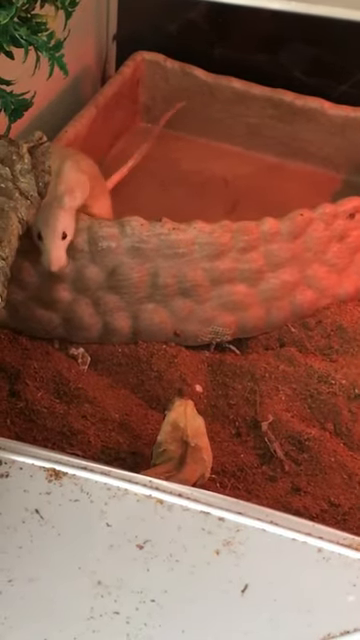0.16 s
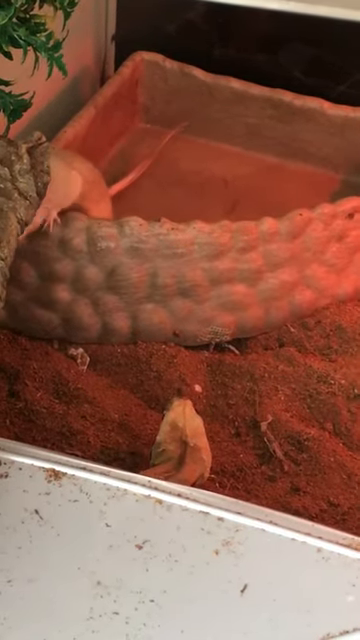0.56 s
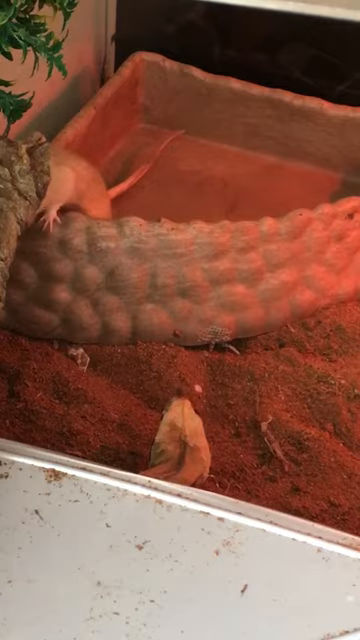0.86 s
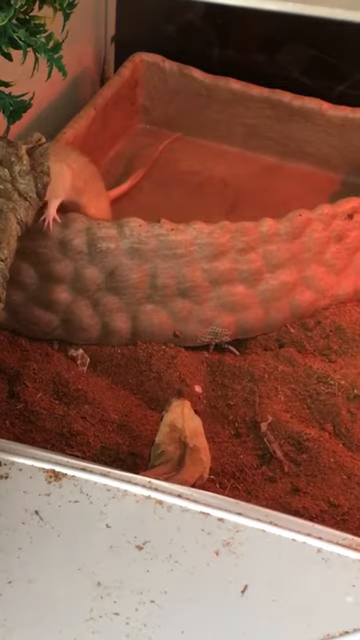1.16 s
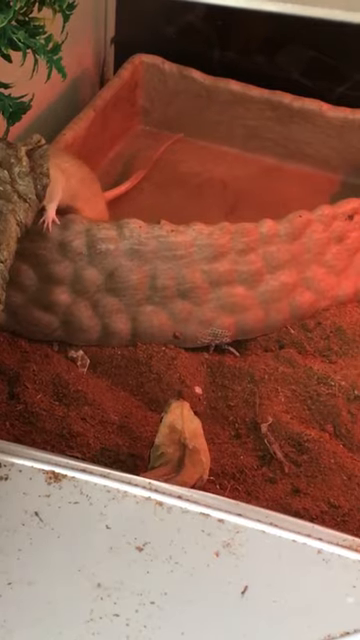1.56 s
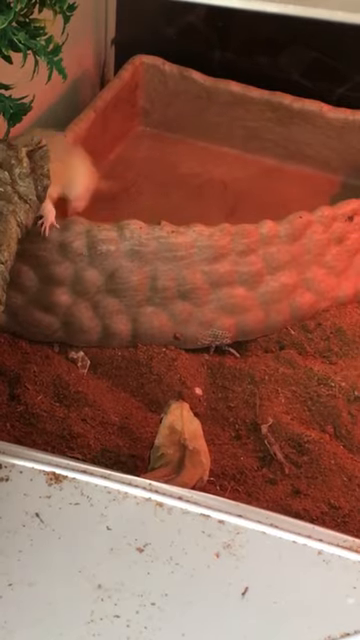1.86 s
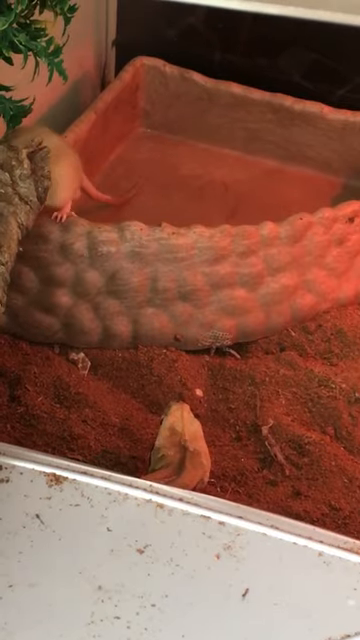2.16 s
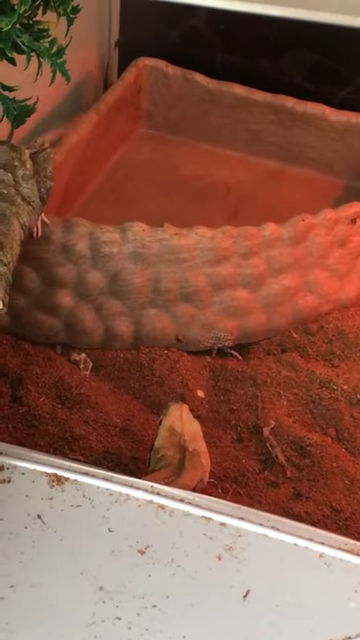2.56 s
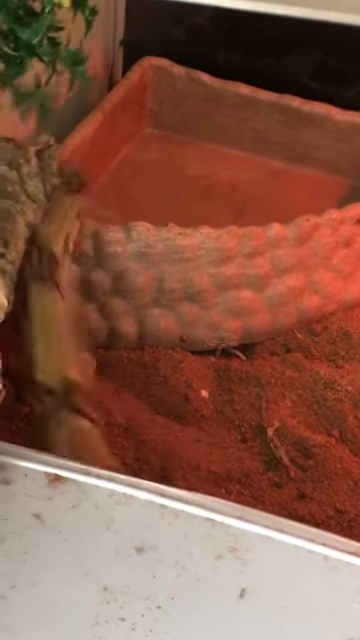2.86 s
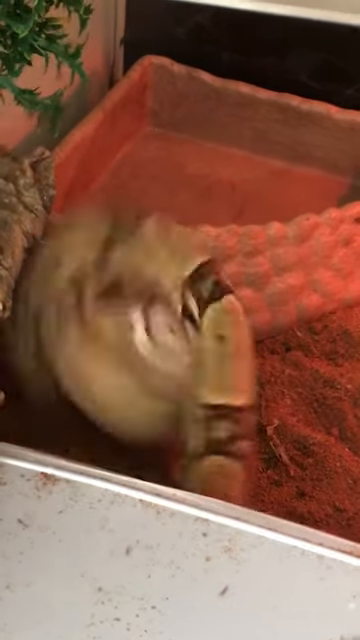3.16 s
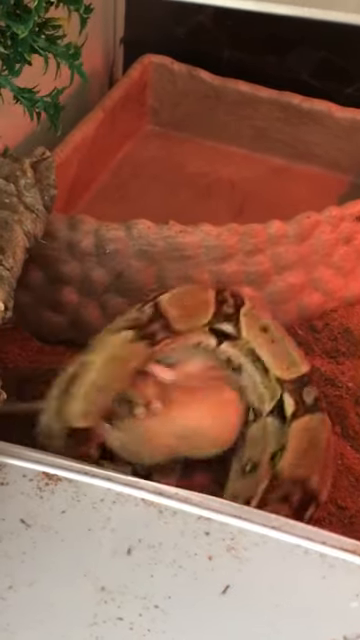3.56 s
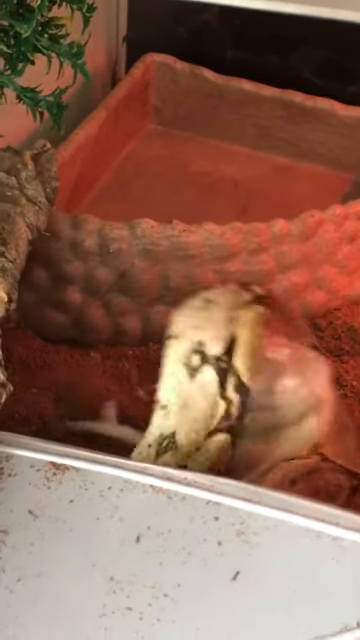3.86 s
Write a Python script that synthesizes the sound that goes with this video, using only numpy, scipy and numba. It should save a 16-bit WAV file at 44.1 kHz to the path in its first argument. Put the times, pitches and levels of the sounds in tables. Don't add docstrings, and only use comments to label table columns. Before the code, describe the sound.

A rat's two hoarse squeals dominate. Quiet low room hum comes first, with faint dry ticks around 1.4 to 2.2 seconds. At 2.7 a snake lunges: sharp scuffs and heavy hollow thuds, strongest near 2.75 and 3.1, rattle loose bedding. A breathy, rasping squeal runs 2.8 to 3.27; a second starts abruptly at 3.45, dulling and fading by 3.9. Close phone pickup, short boxy echoes.

```python
import sys
import numpy as np
from scipy import signal
from scipy.fft import rfft, irfft
from scipy.io import wavfile
from scipy.ndimage import uniform_filter1d
from numba import njit

SR = 44100
rng = np.random.default_rng(int(sys.argv[2]) if len(sys.argv) > 2 else 0)


def natural_amplitude(level_db):
    exponent = np.asarray(level_db, float) / 20
    return 10 ** exponent


def put_to_file(sound):
    columns = np.atleast_2d(sound).T
    safe = np.clip(columns, -1, 1)
    whole_steps = np.round(safe * 32767)
    wavfile.write(sys.argv[1], SR, whole_steps.astype(np.int16))


N = 176400


def rms_one(x):
    return x / np.sqrt(np.mean(x ** 2) + 1e-20)


def drift(rate_hz):
    r = np.exp(-2 * np.pi * rate_hz / SR)
    noise = rng.standard_normal(N + SR)
    return rms_one(signal.lfilter([1], [1, -2 * r, r * r], noise)[SR:])


def filtered(x, order, hz, kind):
    return signal.sosfilt(signal.butter(order, hz, kind, fs=SR, output="sos"), x)


def coloured(points, humps=()):
    hz = np.fft.rfftfreq(N, 1 / SR) + 1
    table = np.array(points)
    level_db = np.interp(np.log(hz), np.log(table[:, 0]), table[:, 1])
    level_db = level_db - 50 * np.maximum(np.log2(table[0, 0] / hz), 0)
    for centre_hz, width_hz, db in humps:
        level_db = level_db + db * np.exp(-((hz - centre_hz) / width_hz) ** 2 * 2)
    return rms_one(irfft(rfft(rng.standard_normal(N)) * natural_amplitude(level_db), N))


def swell(t, rise_s, t60):
    t = np.maximum(t, 0)
    return (1 - np.exp(-t / rise_s)) ** 2 * natural_amplitude(-60 * t / t60)


@njit
def resonate(x, cos_w, r):
    y = np.zeros(len(x))
    for i in range(2, len(x)):
        y[i] = x[i] - x[i - 2] + 2 * r * cos_w[i] * y[i - 1] - r * r * y[i - 2]
    return y


def cavity(air, hz, width_hz):
    cos_w = np.cos(2 * np.pi * np.clip(hz + np.zeros(N), 10, .45 * SR) / SR)
    r = np.exp(-np.pi * width_hz * 1.5 / SR)
    return rms_one(resonate(resonate(air, cos_w, r), cos_w, r))


# f/Hz, level/dB per Hz
ROOM_TONE = [(42, -5.5), (88, -1), (131, -9), (355, -18), (1280, -20.5), (2300, -25), (3000, -29.5),
             (9500, -39.5), (15800, -50.5)]
# f/Hz, width/Hz, level/dB
ROOM_HUMPS = [(54.4, 20.4, 6), (80.4, 10, -2), (131.6, 17, -10.5), (168.2, 11.7, 8.5), (220, 14, 9),
              (267.6, 18, -9), (375, 36, 7.5), (526, 49, -4.5), (626, 19, 6.5), (836, 27, -8.5),
              (990, 78, 2), (1267, 22, 4), (4880, 410, -3), (7700, 710, -3), (10400, 550, -5.5)]


def room_tone(cry):
    duck_db, recovery_hz = -1.5, 0.83
    r = np.exp(-2 * np.pi * recovery_hz / SR)
    loud = np.tanh(60 * signal.lfilter([1 - r], [1, -r], np.abs(cry)))
    return natural_amplitude(-38 + 0.5 * drift(1.54) + duck_db * loud) * coloured(ROOM_TONE, ROOM_HUMPS)


def enclosure_tail(x):
    t = np.arange(SR // 2) / SR
    tail = signal.lfilter([1], [1, -.55], rng.standard_normal(len(t)))
    tail = filtered(tail * swell(t, 0.0011, 0.11), 2, 900, "high")
    return natural_amplitude(-10.5) * signal.fftconvolve(x, tail / np.sqrt(np.sum(tail ** 2)))[:N]


def debris():
    level_db, hardness_share, rise_s, t60_s = -22, 1.45, 0.023, 0.13
    t = np.arange(N) / SR
    shake = np.zeros(N)
    for s, db, hard_db, _ in THUDS:
        shake += natural_amplitude(db + level_db + hardness_share * hard_db) * swell(t - s, rise_s, t60_s)
    grains = rng.standard_normal(N) * natural_amplitude(2.0 * drift(60))
    return shake * rms_one(filtered(grains, 2, [244, 700], "band"))


# t/s, level/dB, hardness/dB, ring length/multiple of t60
THUDS = [(2.673, -32, 11, 1.01), (2.728, -12, 6, .7), (2.738, 5, 3.5, .92), (2.794, -21.5, 11.5, 1.01),
         (2.826, -23, 11.5, 1.01), (2.866, -3.5, 1, .6), (2.902, -18.5, 7, 1.01), (2.948, -18, -12, 1.01),
         (3.001, -24, -19, .8), (3.039, -24.5, 14, 1.01), (3.1, 4, -9, .55), (3.141, -30, 2, 1.01),
         (3.151, -16.5, -17, .8), (3.21, -33, -11, 1.01), (2.885, -27, -24, .9), (2.762, -19, 9.5, 1.01),
         (3.01, -37, 13, 1.01), (3.061, -27, 11.5, 1.01), (3.121, -27.5, 13.5, 1.01),
         (2.809, -23.5, 10, 1.01)]
# f/Hz, level/dB, t60/s, swell/s, share of hardness/1
FLOOR_MODES = [(76, -3, 0.12, 0.067, -1.69), (127.6, 16, 0.097, 0.023, 0.041),
               (186.6, 10, 0.034, 0.0056, 0.47), (249.7, -10, 0.096, 0.01, 1.5),
               (338, -13, 0.046, 0.0063, 1.83), (469, -29, 0.1, 0.0092, 1.75),
               (600, -37, 0.053, 0.009, 0.98), (740, -45, 0.13, .004, 1.9),
               (1166, -22.5, 0.052, 0.0029, 0.88)]


def thuds():
    out, t = np.zeros(N + SR), np.arange(SR // 2) / SR
    for s, db, hard_db, ring in THUDS:
        i = int(s * SR)
        for hz, mode_db, t60, rise_s, share in FLOOR_MODES:
            detune, phase = rng.standard_normal(2)
            wave = np.sin(2 * np.pi * hz * (1 + 0.051 * detune) * t + 2 * phase)
            level = natural_amplitude(db + mode_db + share * hard_db)
            out[i:i + len(t)] += level * swell(t, rise_s, t60 * ring) * wave
    return out[:N]


# t/s, level/dB, rise/s, t60/s, tilt/dB per octave
SCUFFS = [(1.395, -62, .003, .05, 3), (1.76, -40, 0.011, 0.11, 1), (1.853, -41, 0.0015, 0.035, -1),
          (2.15, -57, 0.025, 0.35, 14), (2.675, -39.5, 0.0036, 0.19, 5), (2.684, -39, 0.00034, 0.023, -7),
          (2.728, -17.5, 0.0044, 0.046, 0), (2.7354, -14, 0.00096, 0.047, 3.5),
          (2.775, -30.5, 0.0014, 0.16, -4), (3.310, -52, 0.00067, 0.021, 12),
          (3.413, -45, 0.0015, 0.03, 12.5)]
# f/Hz, level/dB per Hz
GRIT = [(530, -47), (900, -2), (1160, -10), (1420, -6), (4920, -4.5), (5610, -3), (16000, -23)]


def scuffs():
    grit = coloured(GRIT) * natural_amplitude(1.0 * drift(270))
    out, t = np.zeros(N + SR), np.arange(SR // 4) / SR
    octaves = np.log2(np.fft.rfftfreq(len(t), 1 / SR) / 5000 + 0.046)
    for s, db, rise_s, t60, tilt_db in SCUFFS:
        i = int(s * SR)
        burst = irfft(rfft(grit[i:i + len(t)]) * natural_amplitude(tilt_db * octaves), len(t))
        out[i:i + len(t)] += natural_amplitude(db) * swell(t, rise_s, t60) * burst
    return out[:N]


def slapped(air):
    slaps_per_s, jitter_db, slap_db, spread_db = 390, 2.5, 8.5, 2.5
    beats = np.floor(np.cumsum(slaps_per_s * natural_amplitude(jitter_db * drift(90))) / SR)
    onsets = 1.0 * (np.diff(beats, prepend=0) > 0)
    strength = natural_amplitude(slap_db + spread_db * np.minimum(rng.exponential(1, N), 1.9))
    return air * (1 + uniform_filter1d(onsets, size=5) * 5 * strength)


def throat(rasp, hz):
    return cavity(rasp, hz, 644) - natural_amplitude(-10) * cavity(rasp, hz * 1.1, 870)


def airway(air, table, scale_hz, control_db, patch, moved):
    out = np.zeros(N)
    for k, (place, width_hz, db) in enumerate(table):
        level = (-1) ** k * natural_amplitude(db + control_db) * patch()
        out += level * cavity(air, scale_hz * place * moved(), width_hz)
    return out


def fixed_cavities(air, table):
    return sum(natural_amplitude(db) * cavity(air, hz, width_hz) for hz, width_hz, db in table)


# t/s, level over effort/dB
LIP_HISS = [(2.8, 0), (2.85, -4), (2.9, -6), (2.94, 3), (3.0, -7), (3.04, -8), (3.075, 8), (3.11, -4),
            (3.16, 1), (3.26, -5), (3.46, 3), (3.52, 0), (3.58, 1), (3.68, 4), (3.76, 6), (3.83, 6),
            (3.92, -4)]


def lip_hiss(t):
    hiss = filtered(rng.standard_normal(N), 2, 5700, "high")
    return natural_amplitude(-13 + np.interp(t, *np.transpose(LIP_HISS))) * hiss


# f/multiple of throat, width/Hz, level/dB
TONGUE = [(1.3, 700, -1), (1.65, 960, -7.5)]
# f/multiple of throat, width/Hz, level/dB
MOUTH = [(2.12, 1300, -5.5), (2.62, 600, -16.5), (2.97, 930, -9.5), (3.4, 1390, -26), (3.75, 1510, -19)]
# f/Hz, width/Hz, level/dB
CHEST = [(1845, 370, -25), (2400, 1300, -23.5)]
# f/Hz, width/Hz, level/dB
SQUEEZED_FIRST = [(2090, 660, -15.5), (3280, 310, -3), (5300, 2040, 2.5), (5980, 1640, 8.5),
                  (7900, 970, -7), (8980, 1400, 0)]
SQUEEZED_SECOND = [(2180, 470, -6.5), (3350, 280, -0.5), (5570, 180, -7), (6440, 420, -11),
                   (12360, 1100, -9.5), (14600, 1600, -17)]
# f/Hz, width/Hz, level/dB
WHEEZE = [(976, 200, -23.5), (1250, 230, -19)]
# t/s, effort/dB, throat f/Hz, tongue gap/dB, mouth
# opening/dB, squeeze/dB
FIRST_SQUEAL = [(2.79, -51, 4100, -10, 16.5, -14), (2.808, -32, 3800, -21, 5, -28),
                (2.825, -33.5, 3830, -8, 0, -6), (2.835, -26, 4210, -7, 2, -7.5),
                (2.852, -31.5, 4100, -8, 5, -13), (2.862, -22, 3760, -12, 2.5, -13.5),
                (2.885, -27.5, 3770, -16, 4.5, -16), (2.897, -24, 3700, -14, -4, -18.5),
                (2.91, -26, 3700, -14, 0, -25),
                (2.92, -27.5, 3800, -12, 0, -29), (2.932, -19, 3870, -8, -3, -11),
               (2.955, -19, 3940, -12, -3, -14), (2.985, -17, 3950, -5, -4.5, -15),
               (3.002, -18, 3820, 0, -3, -18), (3.017, -23, 3900, -12, 1, -3),
                (3.017, -22.5, 4100, -4, -9, -22), (3.028, -12, 4120, -3.5, -2.5, -42),
                (3.06, -18.5, 4100, -7.5, 2, -26), (3.082, -15, 3820, -4.5, -2, -20),
                (3.125, -18, 3630, -4, -1.5, -8), (3.165, -23.5, 3880, 3, -43, 1.5),
                (3.21, -23.5, 4270, -11, -22, -6), (3.254, -23, 4270, -19, -21, -4.5),
                (3.272, -61, 4260, -12, -16, -18)]
SECOND_SQUEAL = [(3.45, -51, 4100, -9, 2, -27), (3.456, -21, 4130, -9, -11, -27),
                 (3.465, -15, 4100, -13, -8, -18), (3.471, -22, 4100, -1, -0.5, -18),
                 (3.48, -9.5, 3810, -18, -9.5, -34), (3.492, -23, 4000, 2, 1, -8),
                 (3.51, -13, 4100, -26, -1.5, -24),
                 (3.511, -17.5, 3900, -10, -2, -37), (3.53, -12, 4050, -8.5, -5.5, -33),
                 (3.556, -15.5, 4350, -5.5, 0.5, -15), (3.575, -17.5, 4780, -12, -1.5, -12.5),
                 (3.6, -17, 4200, -9, 4, -21), (3.616, -22.5, 4200, -5, 0, -12),
                 (3.628, -18.5, 4280, -4.5, 0, -18.5), (3.66, -20, 4140, -3.5, 2.5, -10),
                 (3.68, -22, 4120, -2, 0, -11.5),
                 (3.705, -24, 4200, -7, 3.5, -13), (3.735, -22, 4270, -2.5, -5.5, -15.5),
               (3.78, -19.5, 4450, -6.5, -18, -15.5), (3.81, -25.5, 4050, -0.5, -17, -3),
               (3.85, -30.5, 3780, 2, -2, 1), (3.88, -26.5, 3400, -9, -14, -3),
               (3.907, -24, 3200, -30, -13, -10.5), (3.924, -49, 3300, -16, -16, -16)]


def squeals():
    second_s = 3.38
    t = np.arange(N) / SR
    bursts = FIRST_SQUEAL + SECOND_SQUEAL
    s, effort_db, *controls = np.transpose(sorted(bursts))
    hz, tongue_db, mouth_db, squeeze_db = [np.interp(t, s, c) for c in controls]
    gain = np.zeros(N)
    for one in (s < second_s, s > second_s):
        gain += natural_amplitude(np.interp(t, s[one], effort_db[one], left=-120, right=-120))

    wander, shift = natural_amplitude(1.47 * drift(35)), 1 + 0.025 * drift(21)
    patch = lambda: np.roll(wander, rng.integers(N))
    moved = lambda: np.roll(shift, rng.integers(N))
    root_moved = lambda: np.sqrt(moved())

    air = rng.standard_normal(N)
    rest_hz, mouth_follows = 4100, 0.37
    mouth_hz = rest_hz * (hz / rest_hz) ** mouth_follows
    bright = throat(slapped(air), hz)
    bright = bright + airway(air, TONGUE, mouth_hz, tongue_db, patch, moved)
    bright = bright + airway(air, MOUTH, mouth_hz, mouth_db, patch, moved)
    out = filtered(bright, 6, 3160, "high") + fixed_cavities(air, CHEST)
    out = out + (t < second_s) * airway(air, SQUEEZED_FIRST, 1, squeeze_db, patch, root_moved)
    out = out + (t >= second_s) * airway(air, SQUEEZED_SECOND, 1, squeeze_db, patch, root_moved)

    creep = np.clip((t - 3.46) / 0.31, 0, 1) * natural_amplitude(-0.6 * (np.interp(t, s, effort_db) + 20))
    out = out + creep * fixed_cavities(air, WHEEZE)
    return gain * (out + patch() * lip_hiss(t))


# t/s, lag/ms
BOUNCE = [(2.8, 1.236), (3.05, 1.134), (3.2, 1.26), (3.3, 0.76), (3.45, 1.29), (3.6, 1.3), (3.75, 1.36),
          (3.9, 1.41)]


def with_bounce(cry):
    t = np.arange(N) / SR
    lag_s = np.interp(t, *np.transpose(BOUNCE)) / 1000
    return cry - natural_amplitude(-15) * np.interp(t - lag_s, t, cry)


# lag/s, level/dB
WALL_ECHOES = [(.00162, -20), (.00265, -35), (.0049, -18.5)]


def with_wall_echoes(cry):
    return cry + sum(natural_amplitude(db) * np.roll(cry, round(lag_s * SR)) for lag_s, db in WALL_ECHOES)


def scene():
    cry = with_bounce(squeals())
    near = scuffs() + 0.94 * with_wall_echoes(cry)
    return (room_tone(cry) + enclosure_tail(near) + debris() + thuds() + near)[None, :]


def low_pass(x):
    return signal.sosfilt(signal.butter(12, 16300, fs=SR, output="sos"), x)


def record(dry):
    rounded = 1.4 * np.tanh(dry / 1.4)
    mix = signal.sosfilt(signal.ellip(12, .5, 70, 15800, fs=SR, output="sos"), rounded)
    return low_pass(mix)


dry = scene()
out = record(dry)
put_to_file(out)
```